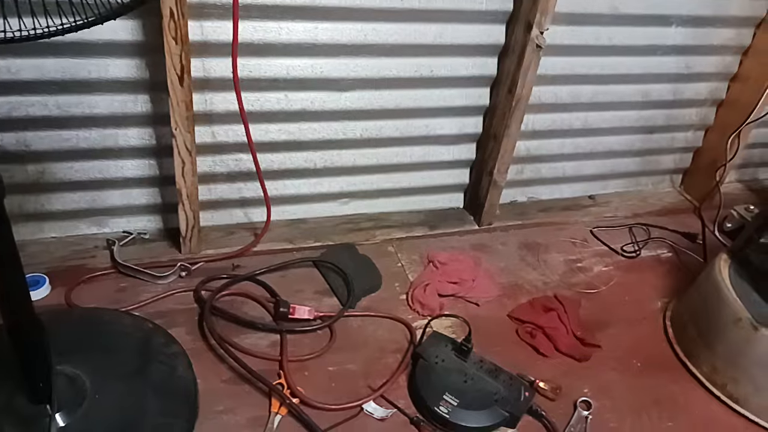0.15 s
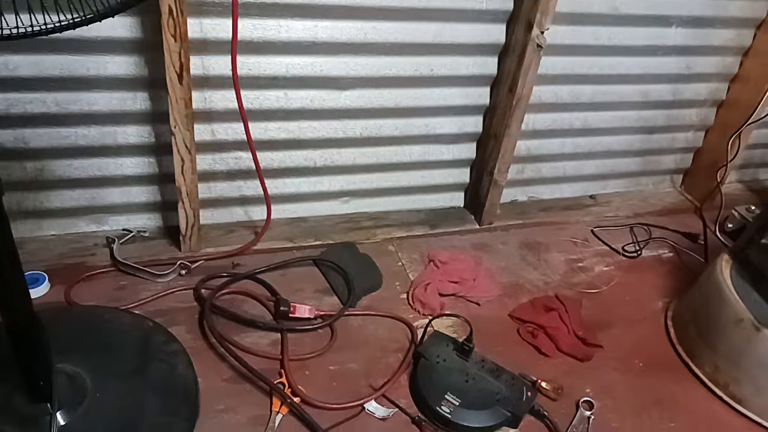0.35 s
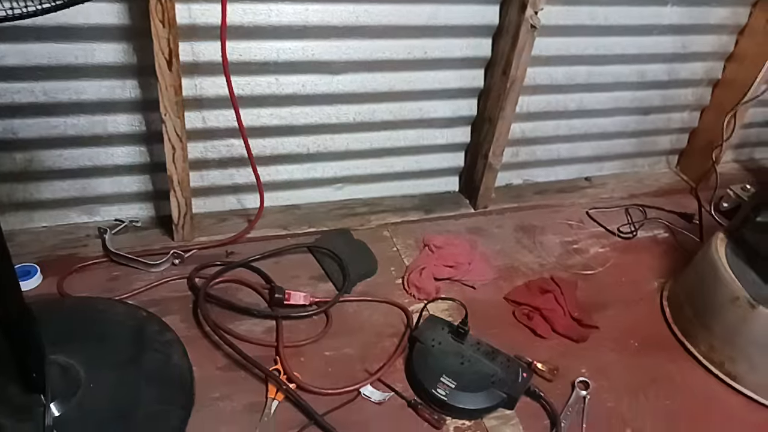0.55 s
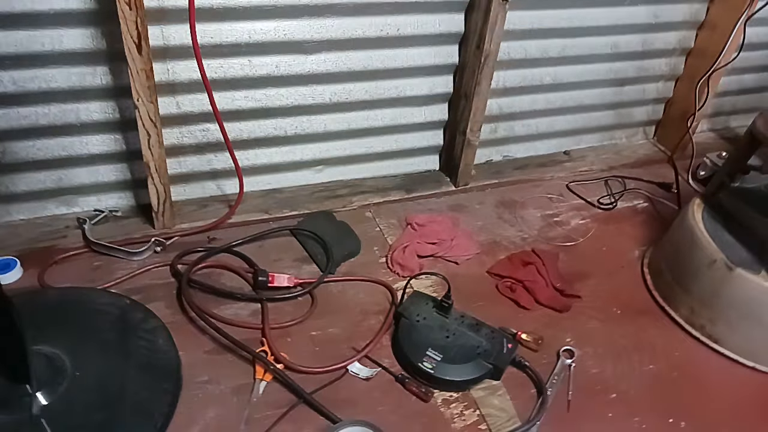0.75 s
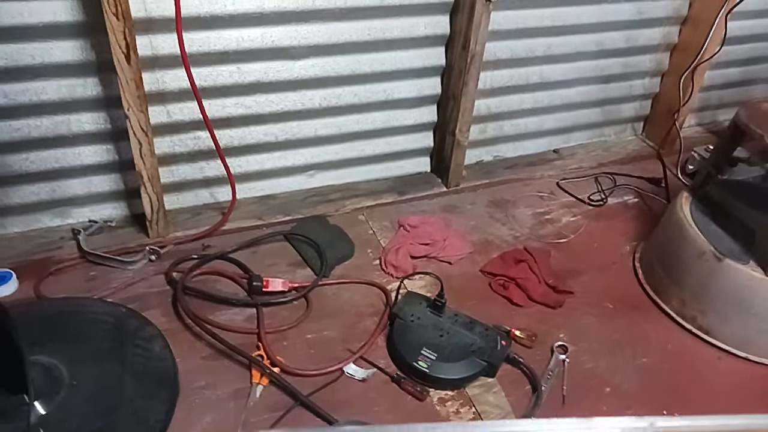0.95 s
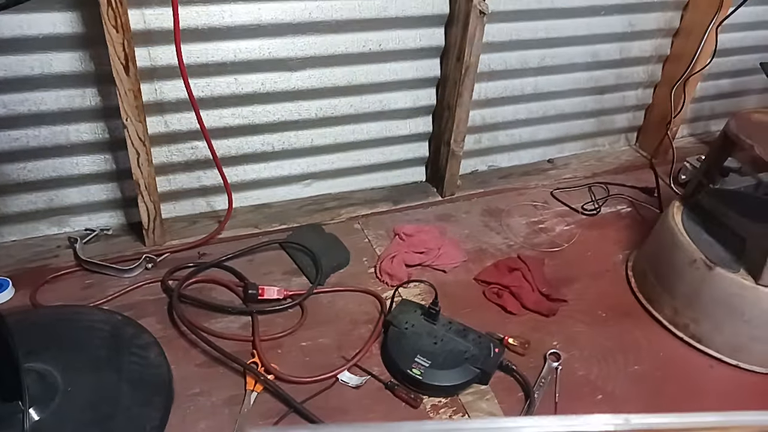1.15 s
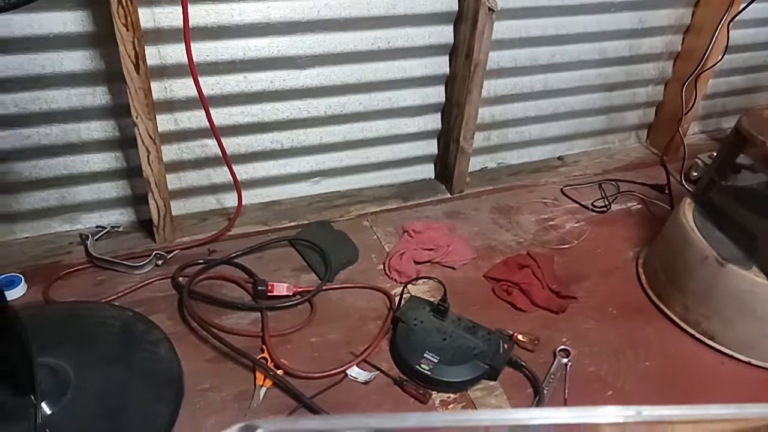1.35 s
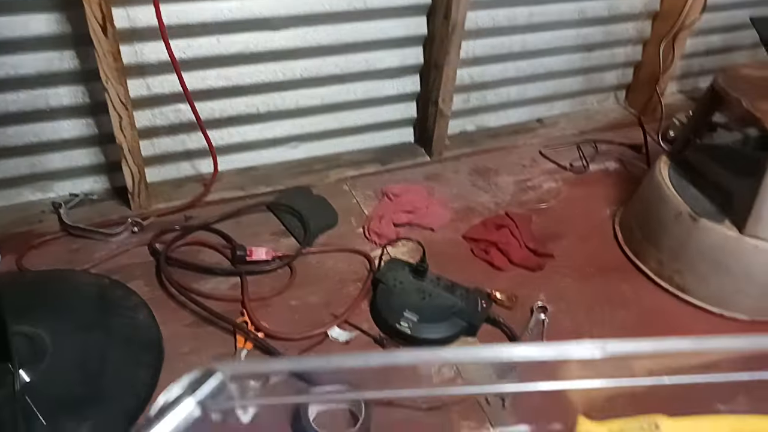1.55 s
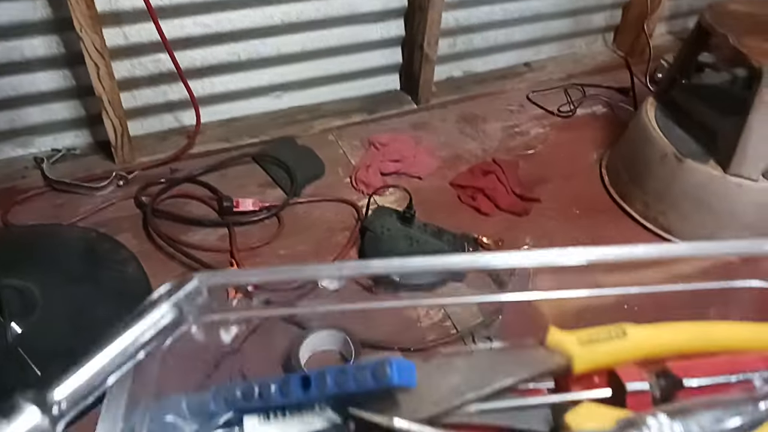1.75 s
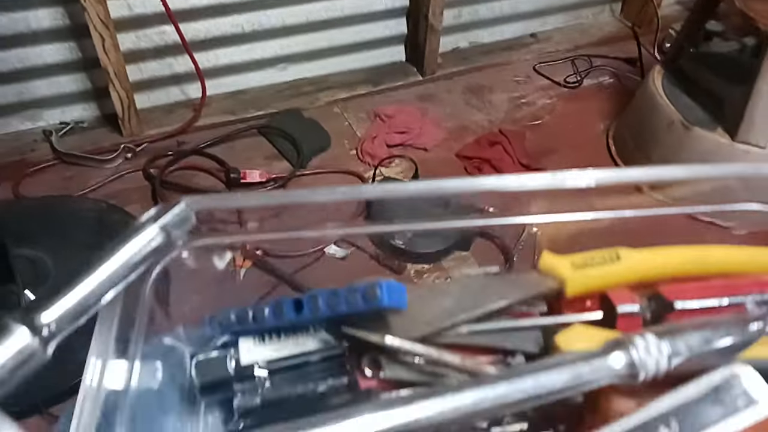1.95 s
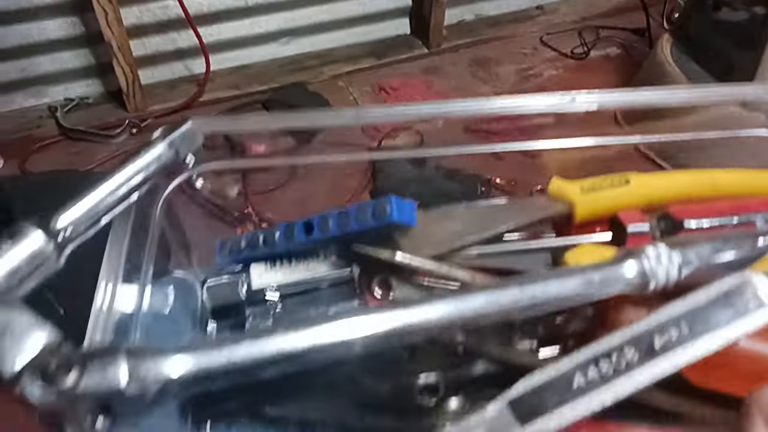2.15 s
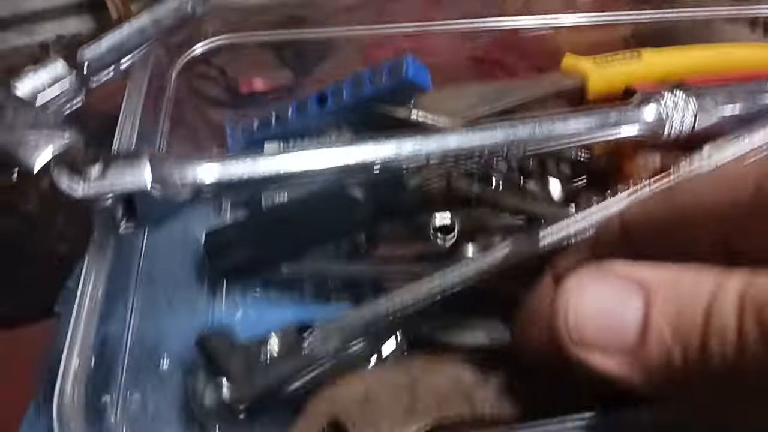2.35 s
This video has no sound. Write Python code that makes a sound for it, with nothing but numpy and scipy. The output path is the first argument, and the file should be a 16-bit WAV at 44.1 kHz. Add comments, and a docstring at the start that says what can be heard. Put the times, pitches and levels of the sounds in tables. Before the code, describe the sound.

Metal tools shift in a plastic box, heard close in a small shed. Sliding and light knocks open it; a sharp ringing clink comes at 0.35 s, a brief drag at 0.43, the heaviest hollow clatter at 0.5, and another clink at 0.7. From 0.8 to 1.9 s it is nearly quiet with faint taps, then softer knocks, small clinks near 2.07 and rising sliding until 2.4.

```python
"""Steel hand tools shift about in a clear plastic tool box as it is picked up and carried in a small tin shed.
From the start handling rumbles faintly under sliding tools: shaped noise in grains, with tiny ticks and rings.
Knocks soon join, decaying box modes under bursts of contact noise, then light taps that ring the box alone.
Steel next clinks on steel in modes with crowded side modes, and one tool briefly drags as resonant noise.
Everything quietens in the middle, then knocks, clinks and sliding gather again towards the end;
sparse echoes of the box and the shed follow the sounds of the tools."""
import sys
import numpy as np
from scipy import signal
from scipy.fft import rfft, irfft
from scipy.io import wavfile

SR = 44100
rng = np.random.default_rng(int(sys.argv[2]) if len(sys.argv) > 2 else 0)


def waveform_to_disk(signal):
    """Save audio, clipped to [-1, 1], as 16-bit WAV at the path in sys.argv[1]."""
    frames = np.transpose(np.atleast_2d(signal))
    scaled = np.clip(frames, -1, 1) * 32767
    samples = np.round(scaled).astype(np.int16)
    wavfile.write(sys.argv[1], SR, samples)


N = 105840  # samples in the scene

# spectrum of a dull contact: hz, level_db (per Hz, relative)
CLACK = [(130, -30.5), (260, -5), (1150, 4), (2200, -0.5), (3000, -7.5), (16000, -60.5)]
# spectrum of a fine, sharp contact: hz, level_db (per Hz, relative)
SNAP = [(1000, -45), (6500, -17.5), (10000, -5), (12500, 1), (16000, -4.5)]
TICK_T60_S = 0.027
CONTACT_RISE_S = 0.00042
PORT_DELAY_S = 0.00018  # the right microphone hears later
GRAIN_DB, GRAIN_S = 4, .004  # strength and spacing of the grains of friction
TAP_DAMPING = 1.5  # the hand on the box shortens its ring


def amp(db):
    """Level in decibels is twenty times the logarithm of gain; this inverts it."""
    return 10 ** (np.asarray(db) / 20)


def read(points, hz):
    """Interpolates along logarithmic frequency, close to the scale of pitch."""
    f, value = np.transpose(points)
    return np.interp(np.log(hz + 1), np.log(f + 1), value)


def envelope(points):
    """Straight lines in decibels make exponential swells and decays of gain."""
    return amp(np.interp(np.arange(N) / SR, *np.transpose(points)))


def evened(x):
    """Mean power sets the level of a steady sound: scales to rms 1."""
    return x / np.sqrt(np.mean(x ** 2) + 1e-20)


def struck(x, size=353):
    """Early power sets the level of a blow: scales to rms 1 over the first 8 ms."""
    return x / np.sqrt(np.mean(x[:, :size] ** 2) + 1e-20)


def add(mix, s, sound):
    """Superposition: sounds sum linearly, here from time s on."""
    part = mix[:, max(round(s * SR), 0):][:, :sound.shape[1]]
    part += sound[:, :part.shape[1]]


def pair(x):
    """Partial coherence: two unrelated signals become two microphones' signals, most alike in the middle."""
    # coherence of the microphones: hz, left_right_likeness (0 to 1)
    likeness = [(80, 0.3), (300, 0.52), (750, 0.84), (1300, 0.6), (8000, .1)]
    hz = np.fft.rfftfreq(x.shape[1], 1 / SR)
    left, other = rfft(x)
    same = np.clip(read(likeness, hz), -1, 1)
    right = same * left + np.sqrt(1 - same ** 2) * other
    delay = np.exp(-2j * np.pi * hz * PORT_DELAY_S)
    return irfft(np.array([left, right * delay]), x.shape[1])


def noise(colour, size, grain_db=0, grain_s=.001):
    """Filtered randomness: stereo noise in random grains, given a spectrum and scaled to rms 1."""
    t = np.arange(size) / SR
    clumps = np.interp(t / max(grain_s, 1 / SR), np.arange(size), rng.standard_normal(size))
    x = pair(rng.standard_normal((2, size)) * amp(grain_db * np.clip(clumps, -2, 2)))
    gains = amp(read(colour, np.fft.rfftfreq(size, 1 / SR)))
    return evened(irfft(rfft(x) * gains, size))


def scatter(sound, per_s):
    """A random point process: one small sound recurs at random moments, strengths and signs."""
    clicks = (rng.random(N) < per_s / SR) * rng.standard_normal(N)
    return signal.oaconvolve(clicks[None], sound, axes=1)[:, :N]


def background():
    """Low-frequency noise from handling swells and fades over the steady noise of the shed's still air."""
    # level of the handling: time_s, level_db
    handling = [(0, -49), (.25, -67.5), (.5, -47.5), (.76, -53.5), (.86, -71), (.93, -48), (1.15, -81),
                (1.3, -55.5), (1.719, -75), (1.82, -58.5), (2.3, -47.5)]
    # spectrum of the handling: hz, level_db (per Hz, relative)
    rumble = [(15, -21), (45, -0.5), (62, 2), (180, -13.5), (2000, -70.5)]
    # spectrum of the still air: hz, level_db (per Hz, relative)
    air = [(60, -0.5), (210, -15), (340, 3), (2000, -15.5), (16000, -23)]
    air_db = -68.5
    return envelope(handling) * noise(rumble, N) + amp(air_db) * noise(air, N)


def contact(colour, t60, size=4096):
    """Impact noise: two hard things chatter as they meet, in a burst that rises fast and decays."""
    t = np.arange(size) / SR
    chatter = noise(colour, size, grain_db=3, grain_s=0.00045)
    return struck(chatter * (1 - np.exp(-t / CONTACT_RISE_S)) * amp(-60 * t / t60))


def ring(tool, size=13000, count=6):
    """Modal vibration: steel rings in modes and weak side modes, checked and shaken by the tools it lies on."""
    # main modes of each tool: hz, level_db (relative)
    steel = { "ratchet": [(2772, -15), (3155, -6), (4802, -8), (5100, -14), (5565, -4), (6154, 0),
             (6290, -6), (8910, -6), (9983, -2), (11480, -14), (12372, 0), (15230, -7)],
             "socket": [(6180, -2), (8920, -12), (12420, 0)], "bit": [(8950, -18), (10720, -7), (12950, -6),
             (13200, 0), (14600, -7), (15350, 2)], "pliers": [(1020, 5), (2780, 6), (4366, -3), (4587, -2),
             (4800, -3), (6190, -5), (9900, -1), (12750, 0), (13110, 4), (14100, -5), (14900, -1)],
             "extension": [(1180, -1), (3750, -10), (4750, -12), (5455, -5), (6950, -5), (11775, 0),
             (12250, -5), (14920, 2)], "wrench": [(3400, -1), (3736, -5), (6864, 0), (9950, -5), (12300, 1),
             (14880, -1), (15600, -4)], "screwdriver": [(3280, -4), (3730, 0), (4150, -6), (4900, -8),
             (6600, -6)]}
    # reference decay of the steel, before each tool's own factor: hz, t60_s
    steel_t60 = [(1000, .06), (3000, 0.12), (5000, 0.27), (9000, 0.15), (15000, 0.06)]
    # how each tool lies: decay_factor (on the reference t60), shimmer_db (against the main modes)
    lie = {"ratchet": (1.15, -3), "socket": (.7, -9), "bit": (.4, -11), "pliers": (.8, -3),
           "extension": (.6, -4), "wrench": (.9, -3), "screwdriver": (.7, -3)}
    press_s, free_share, shimmer_free_share = 0.005, 0.19, .38  # shares of amplitude that ring on
    rattle, rattle_s = 1, 0.014  # depth and spacing of the wavering
    shimmer_hz = 300  # standard deviation of the side modes around a main mode
    t = np.arange(size) / SR
    length, shimmer_db = lie[tool]
    hz, db = np.transpose(steel[tool])[:, :, None]
    modes = amp(db - 60 * t / (length * read(steel_t60, hz))) * np.exp(2j * np.pi * hz * t)

    # neighbouring tools soak up the first ring; a share rings on
    press = np.exp(-t / press_s)
    phase = rng.random((len(hz), 1)) + rng.uniform(-0.46, 0.04, (2, len(hz), 1))  # cycles
    shakes = np.exp(2j * np.pi * rng.random((len(hz), size)))
    shaken = np.array([np.interp(t / rattle_s, np.arange(size), row) for row in shakes])
    waver = 1 + rattle * (1 - press) * shaken
    main = waver * np.exp(2j * np.pi * phase) * (press + free_share * (1 - press))

    # side modes, each with a random phase at each microphone
    sides = np.exp(2j * np.pi * shimmer_hz * rng.standard_normal((len(hz), count, 1)) * t)
    side_phases = np.exp(2j * np.pi * rng.random((len(hz), 2, count)))
    shimmer = (side_phases @ sides).swapaxes(0, 1) / np.sqrt(count)
    cloud = amp(shimmer_db) * shimmer * (press + shimmer_free_share * (1 - press))

    sound = (modes * (main + cloud)).real.sum(1)
    return struck(sound * (1 - np.exp(-t / CONTACT_RISE_S)))


def sliding():
    """Friction in grains: tools rub the plastic and hiss on each other, with ticks and tiny rings."""
    # level of the rub: time_s, level_db
    slide = [(0, -38), (.05, -45.5), (.11, -52), (.19, -47), (.26, -93), (.34, -61), (0.389, -40.5),
             (.47, -44), (.66, -40), (.76, -53), (.87, -55), (0.947, -44), (0.996, -68), (1.27, -68.5),
             (1.37, -48), (1.43, -69), (1.56, -67), (1.61, -59), (1.759, -73), (1.884, -65), (1.91, -48.5),
             (1.969, -55.5), (2.03, -57.5), (2.1, -48.5), (2.16, -55), (2.2, -49.5), (2.251, -46),
             (2.32, -50.5), (2.4, -38.5)]
    # spectrum of tools on plastic: hz, level_db (per Hz, relative)
    rub = [(170, -29.5), (320, -4), (670, -5), (900, -9.5), (1600, -9.5), (2600, -16.5), (16000, -55.5)]
    # spectrum of steel on steel: hz, level_db (per Hz, relative)
    hiss = [(800, -29.5), (2500, -7.5), (4000, 3), (7000, -2.5), (8800, -11.5), (12300, -2.5), (16000, -8)]
    hiss_db, slip_db = -8, -6  # hiss against the rub; slips against the hiss
    slips_per_s = 24  # mean rate of each kind of touch
    touches = [contact(colour, TICK_T60_S / 2) for colour in (CLACK, SNAP)]
    touches += [ring(tool, size=4096) for tool in ("wrench", "screwdriver")]
    slips = sum(scatter(touch, slips_per_s) for touch in touches)
    rubbing = noise(rub, N, GRAIN_DB, GRAIN_S)
    hissing = noise(hiss, N, GRAIN_DB, GRAIN_S) + amp(slip_db) * slips
    return envelope(slide) * (rubbing + amp(hiss_db) * hissing)


def thud(tilt_db=0, damping=1, size=8192):
    """Modal decay: the plastic box rings in damped sines, varied at random with each place that is hit."""
    # modes before random variation, tilt and damping: hz, level_db (relative), t60_s
    box = [(255, -19.5, 0.029), (294, -18, 0.096), (355.4, -11, 0.092), (458, -11.5, 0.094),
           (543.2, -2.5, 0.059), (638.2, 3, .04), (676.8, 3.5, 0.051), (728, -6, 0.068),
           (828.4, -8.5, 0.087), (1006.3, -8, 0.054), (1197, -15.5, 0.08)]
    spread_db, detune_share, rise_s = 1.73, 0.025, 0.0037
    hz, db, t60 = np.transpose(box)[:, :, None]
    loud, detune = rng.standard_normal((2, len(box), 1))
    delays = np.array([0, PORT_DELAY_S])[:, None, None]
    t = np.maximum(np.arange(size) / SR - delays, 0)
    tilt = tilt_db * np.log2(hz / hz[0])  # dB per octave above the lowest mode
    level_db = db + tilt + spread_db * loud - 60 * damping * t / t60
    modes = amp(level_db) * np.sin(2 * np.pi * hz * (1 + detune_share * detune) * t)
    return struck((modes * (1 - np.exp(-t / rise_s))).sum(1))


def knocks():
    """Impact excitation: each knock is a modal thud of the box under a clack, a tick and a snap."""
    # tools knocking in the box: start_s, thud_db, clack_db, tick_db, snap_db
    blows = [(.014, -41.5, -42, -44.5, -40), (.029, -43.5, -40.5, -48, -42), (.165, -41.5, -31, -41, -44.5),
             (.169, -26.5, -57, -56, -47), (.204, -28.5, -24.5, -34.5, -30.5),
             (0.3531, -41.5, -32, -26.5, -19.5), (.381, -27.5, -23.5, -43.5, -57),
             (.509, -37.5, -15.5, -31.5, -30), (0.5139, -18, -12.5, -37, -49),
             (.5182, -26, -40, -42, -42.5), (.5265, -13.5, -20, -33.5, -36),
             (.532, -21, -18.5, -34.5, -44.5), (.606, -37, -34.5, -40, -68), (.623, -59, -28.5, -37, -34.5),
             (0.6296, -25, -35, -41, -66), (0.6423, -43, -25.5, -32, -34.5), (0.6819, -27, -33, -41.5, -47),
             (0.6928, -25, -21.5, -24, -20), (.699, -27.5, -30, -59, -60.5), (.744, -45.5, -46, -47.5, -39),
             (0.886, -58.5, -58, -49.5, -47), (.908, -41, -52, -55, -52.5),
             (.937, -35, -47.5, -41.5, -40.5), (1.306, -56, -54, -57, -56), (1.36, -43, -55, -50.5, -56.5),
             (1.372, -43, -51, -44, -39.5), (1.655, -58, -65, -58.5, -63),
             (1.912, -37.5, -40, -54.5, -52.5), (1.925, -46.5, -43, -46, -36),
             (2.005, -49, -88, -45, -55.5), (2.074, -45.5, -60, -38, -35), (2.084, -34, -43, -45, -54),
             (2.282, -57, -48, -49.5, -51), (2.364, -35.5, -41.5, -38, -42.5)]
    # spectrum of a bright contact: hz, level_db (per Hz, relative)
    tick = [(500, -46), (3300, 5.5), (7000, -1.5), (8200, -6.5), (16000, -43)]
    clack_t60_s, snap_t60_s = 0.042, 0.022
    heavy_db, heavy_tilt = -24.5, -.4  # heavier blows flex the whole box: dB per octave for each dB more
    out = np.zeros((2, N))
    for s, thud_db, clack_db, tick_db, snap_db in blows:
        add(out, s, amp(thud_db) * thud(heavy_tilt * max(thud_db - heavy_db, 0)))
        add(out, s, amp(clack_db) * contact(CLACK, clack_t60_s))
        add(out, s, amp(tick_db) * contact(tick, TICK_T60_S))
        add(out, s, amp(snap_db) * contact(SNAP, snap_t60_s))
    return out


def taps():
    """Soft blows excite little treble: light taps and random pats of fingers ring only the box."""
    # light taps on the plastic: start_s, level_db
    touches = [(.078, -39), (.129, -47), (.213, -29), (.412, -35.5), (.824, -51.5), (0.856, -56),
               (0.914, -46), (1.207, -55), (1.382, -41.5), (1.502, -59.5), (1.602, -58), (1.7, -53.5),
               (1.943, -37.5), (2.043, -42.5), (2.134, -44.5)]
    tap_tilt_db, pat_tilt_db = -1.5, -11  # dB per octave
    pats_per_s, pat_db = 15, -70
    out = amp(pat_db) * scatter(thud(pat_tilt_db, TAP_DAMPING), pats_per_s)
    for s, db in touches:
        add(out, s, amp(db) * thud(tap_tilt_db, TAP_DAMPING))
    return out


def clinks():
    """Impact excitation: steel meets steel and one tool rings in its modes."""
    # steel ringing on steel: start_s, level_db, tool
    strikes = [(0.203, -29, "socket"), (.353, -18.5, "ratchet"), (.5092, -26.5, "screwdriver"),
               (0.516, -22.5, "bit"), (0.694, -24, "pliers"), (0.936, -47, "wrench"),
               (1.373, -54, "wrench"), (1.925, -39.5, "wrench"), (1.954, -53, "screwdriver"),
               (2.072, -33.5, "extension"), (2.077, -30, "extension"), (2.3287, -47.5, "screwdriver"),
               (2.356, -45.5, "screwdriver"), (2.365, -39, "wrench"), (2.393, -47, "screwdriver")]
    out = np.zeros((2, N))
    for s, level_db, tool in strikes:
        add(out, s, amp(level_db) * ring(tool))
    return out


def scrape():
    """Friction drives a resonance: one tool drags across the plastic in rough slips, swelling and fading."""
    # the drag: level_db, resonance_hz, width_hz
    drag = (-47, 1690, 960)
    start_s, length_s = .427, .076
    db, hz, width = drag
    t = np.arange(N) / SR
    offset = 2 * (np.fft.rfftfreq(N, 1 / SR) - hz) / width
    rough = noise(CLACK, N, GRAIN_DB, GRAIN_S)
    slips = evened(irfft(rfft(rough) / (1 + offset ** 2) ** 2, N))
    swell = np.sqrt(abs(np.sin(np.pi * np.minimum(t / length_s, 1))))
    out = np.zeros((2, N))
    add(out, start_s, amp(db) * slips * swell)
    return out


def echoes(x, t60, first_s, size=24000):
    """Reverberation: sparse reflections of random sign, each band dying at its own speed."""
    signs = rng.choice([-1., 1.], (2, size))
    present = rng.random((2, size)) < 1 / 10
    late = np.arange(size) / SR > first_s
    reflections = pair(signs * present * late)
    hz, t, z = signal.stft(reflections, SR, nperseg=256)
    tail = signal.istft(z * amp(-60 * t / read(t60, hz)[:, None]), SR)[1]
    tail = tail / np.linalg.norm(tail, axis=1, keepdims=True)
    return signal.fftconvolve(x, tail, axes=1)[:, :N]


def box_echoes(x, count=4):
    """Reflections in the box: sounds fade in turn, at a steady rate, between random patterns of echoes."""
    # decay inside the box: hz, t60_s
    near_t60 = [(700, 0.22), (15000, .07)]
    turn = np.arange(N) / SR * 20  # 20 patterns a second
    near = [np.maximum(1 - abs((turn - k) % count - 1), 0) for k in range(count)]
    return sum(echoes(x * np.sqrt(share), near_t60, first_s=0.0064, size=6000) for share in near)


def scene():
    """Direct and reflected sound add: the tools, their echoes in the box and the shed, and the background."""
    # decay of the shed: hz, t60_s
    shed_t60 = [(100, 0.19), (5000, 0.28), (15000, 0.26)]
    near_db, shed_db = -15, -21
    tools = knocks() + taps() + clinks() + sliding() + scrape()
    near = amp(near_db) * box_echoes(tools)
    shed = amp(shed_db) * echoes(tools, shed_t60, first_s=0.017)
    return tools + near + shed + background()


def record(dry):
    """Linear filtering: the two microphones' unequal colour, then the band limit."""
    # balance of the microphones: hz, left_minus_right_db
    balance = [(60, -16.5), (150, -7), (400, 6), (700, -1), (1400, 4), (5000, 1.3), (13000, 3)]
    edge_hz = 15950
    lean_db = read(balance, np.fft.rfftfreq(2 * N, 1 / SR))
    gains = amp(np.array([lean_db, -lean_db]) / 2)
    gains = gains / np.sqrt((gains ** 2).mean(0))  # keeps the mean power of the pair
    heard = irfft(rfft(dry, 2 * N) * gains)[:, :N]
    lowpass = signal.firwin(401, edge_hz, window=("kaiser", 9), fs=SR)
    return signal.oaconvolve(heard, lowpass[None], "same")


dry = scene()
out = record(dry)
waveform_to_disk(out)
```